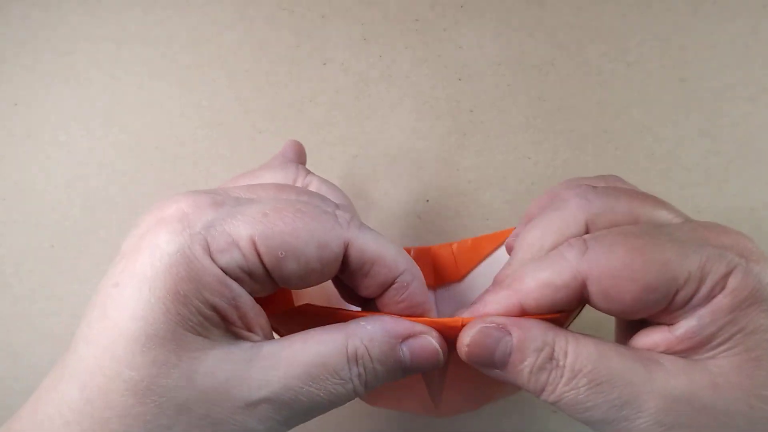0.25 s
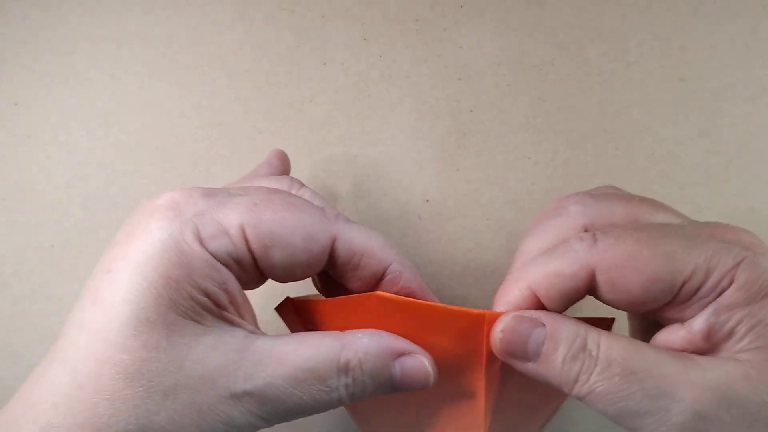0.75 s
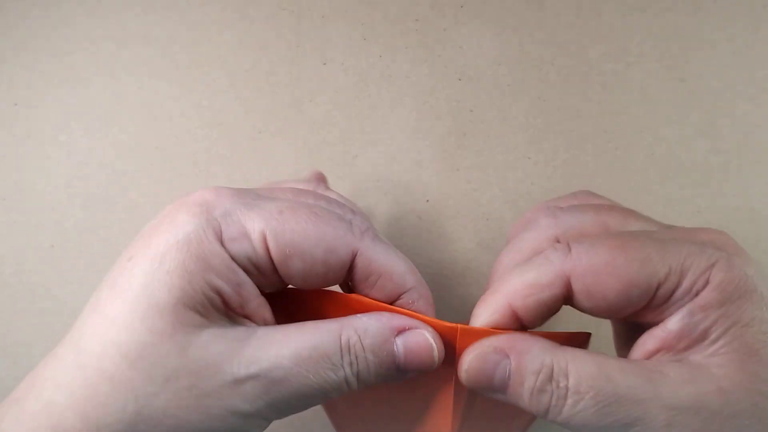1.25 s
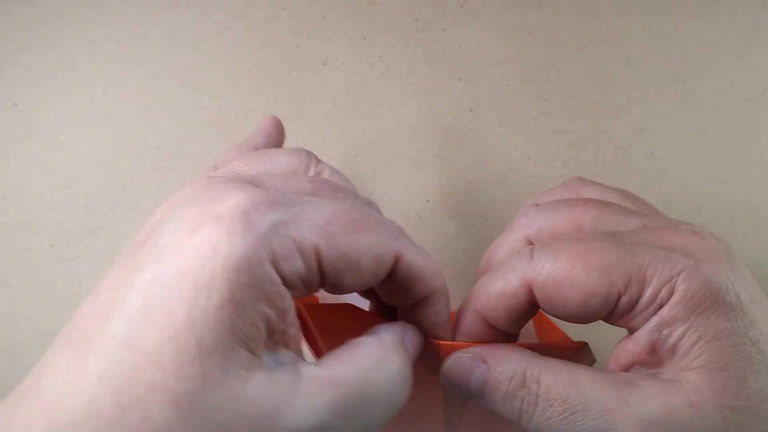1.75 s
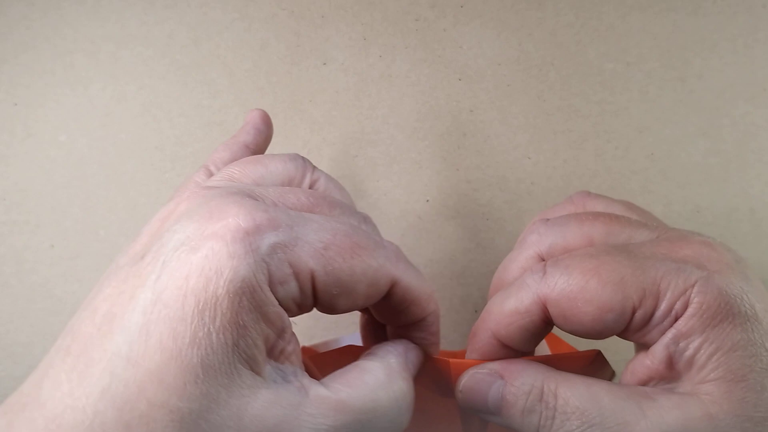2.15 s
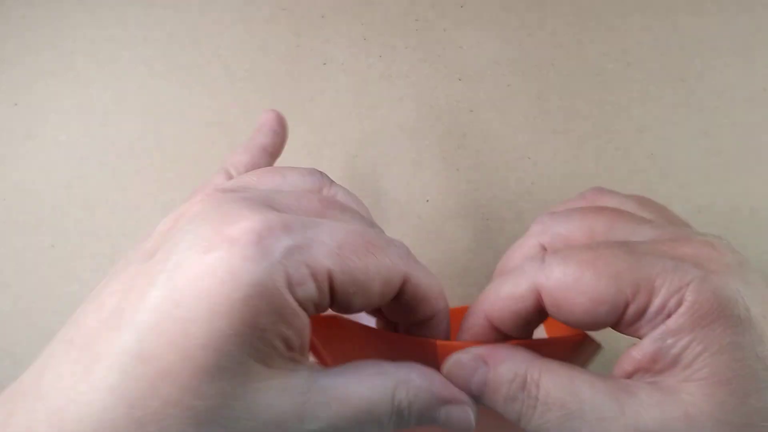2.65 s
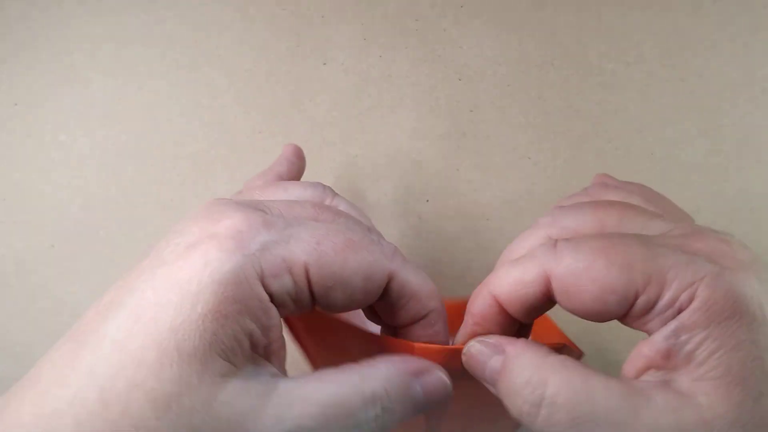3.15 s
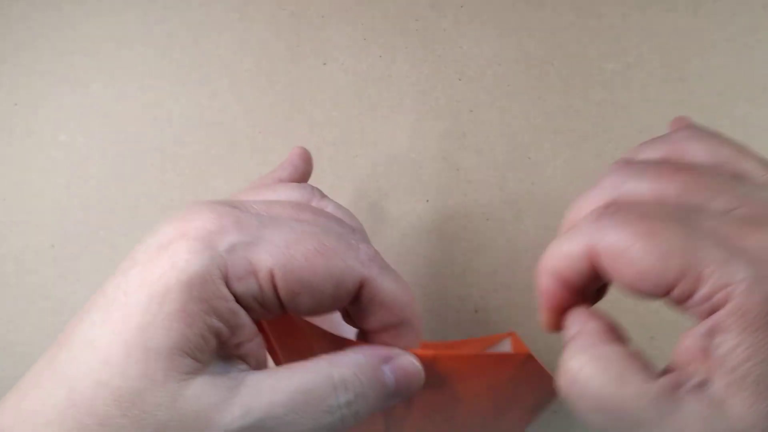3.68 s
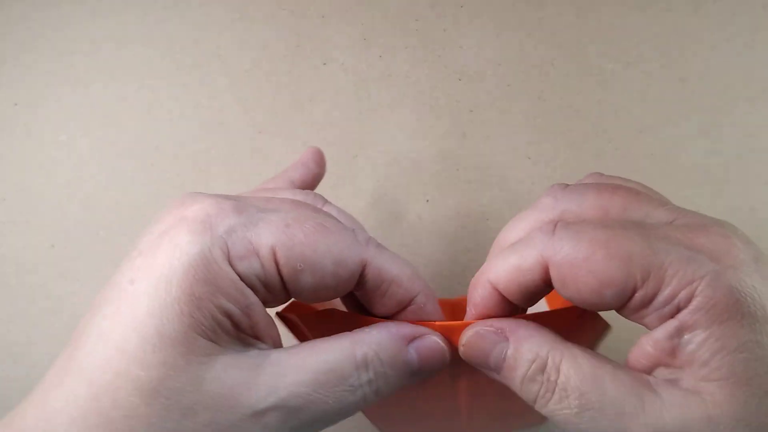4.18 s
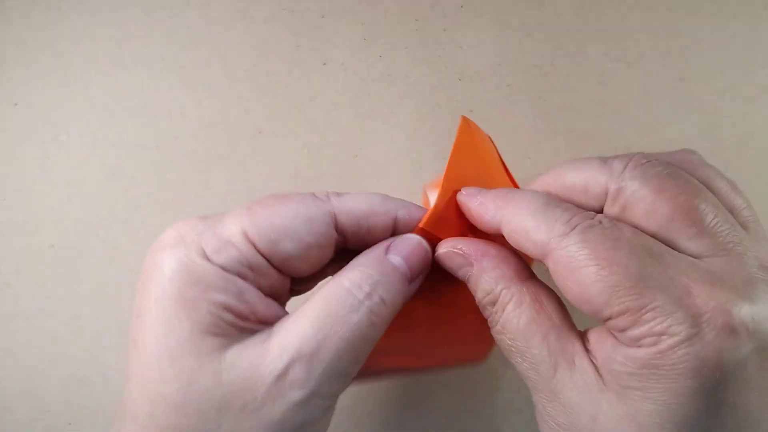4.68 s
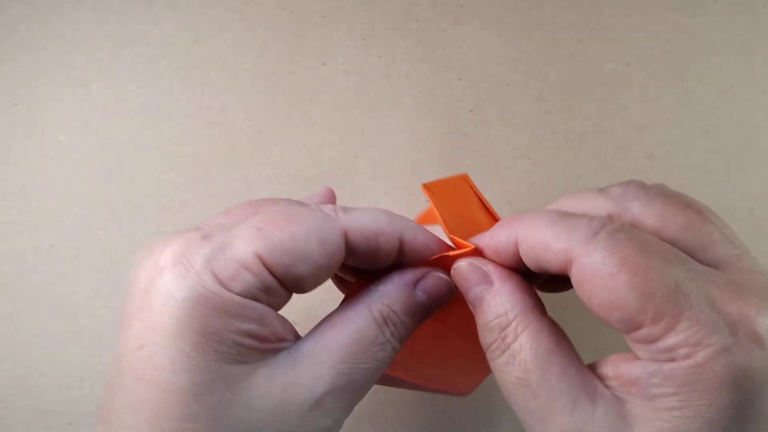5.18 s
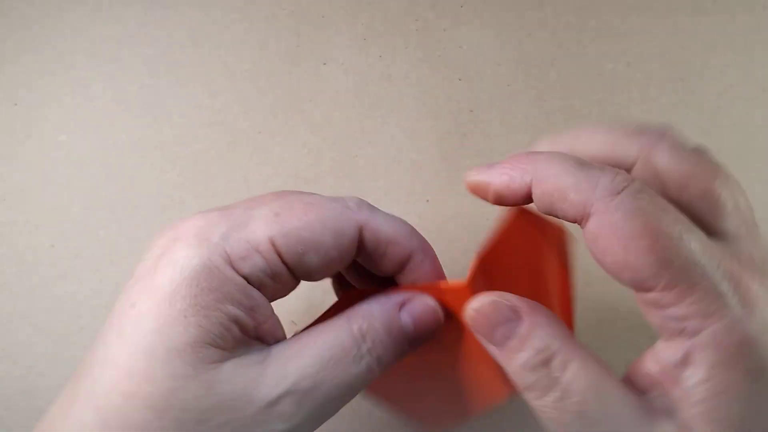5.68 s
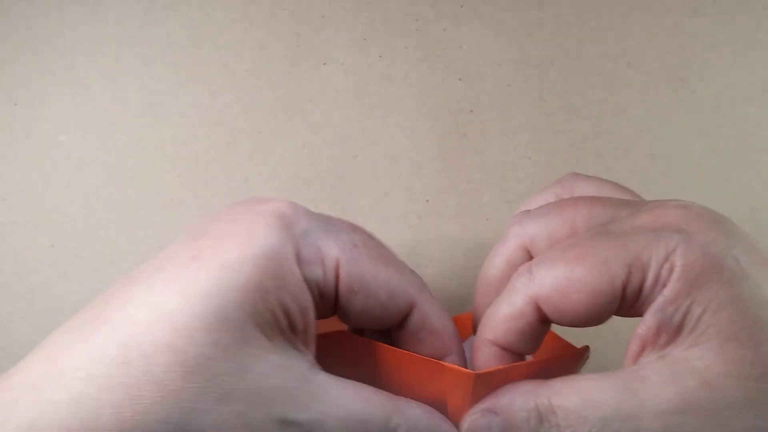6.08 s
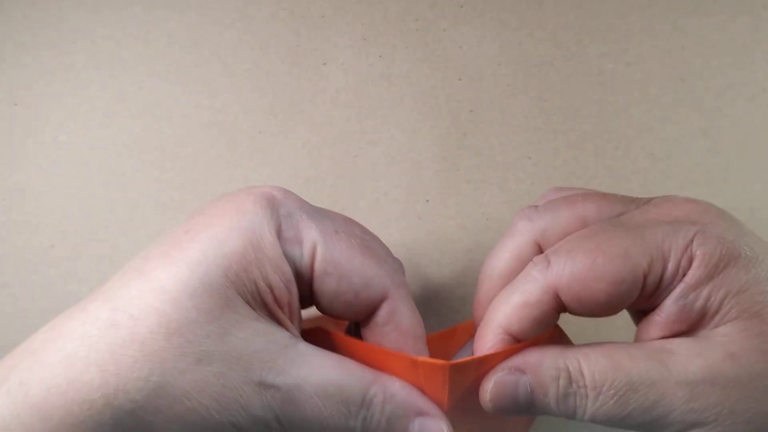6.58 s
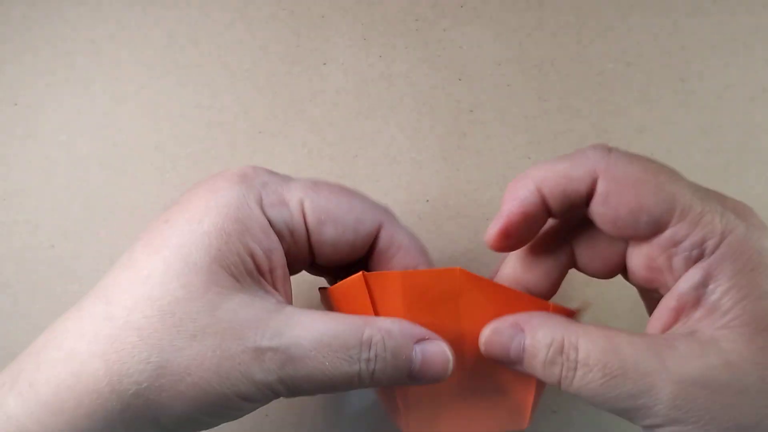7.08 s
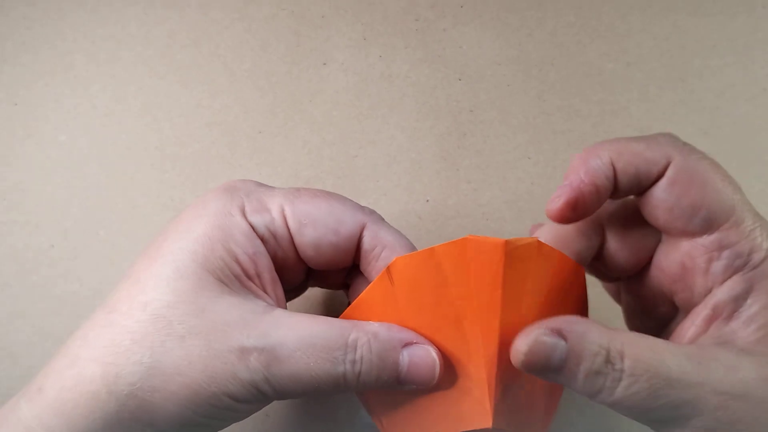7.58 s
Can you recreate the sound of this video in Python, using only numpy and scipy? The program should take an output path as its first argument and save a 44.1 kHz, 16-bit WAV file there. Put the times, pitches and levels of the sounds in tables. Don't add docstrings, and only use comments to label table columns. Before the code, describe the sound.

Hands fold a small stiff sheet of thin paper close to a stereo pair of microphones. Fingertips brush softly, creases crackle brightly, and panels buckle with dry, short pops. Scattered small clicks come first, then a dense rustling crackle near two and a half seconds, sparser handling, and the loudest snaps just after six and seven seconds. Faint desk thuds, slight room reflection, low fan hum and hiss.

```python
import sys
import numpy as np
from scipy import signal
from scipy.fft import rfft, irfft, next_fast_len
from scipy.io import wavfile
from scipy.ndimage import uniform_filter1d, map_coordinates

SR = 44100
rng = np.random.default_rng(int(sys.argv[2]) if len(sys.argv) > 2 else 0)


def attenuation_scalar(level_db):
    decades = np.asarray(level_db, float) / 20
    return 10 ** decades


def file_out(sig):
    cols = np.atleast_2d(sig).T
    lim = np.clip(cols, -1, 1)
    pcm = np.round(lim * 32767).astype(np.int16)
    wavfile.write(sys.argv[1], SR, pcm)


N = 345303


def unit(x):
    return x / np.sqrt(np.mean(x ** 2) + 1e-20)


def along(points, hz):
    point_hz, value = np.transpose(points)
    return np.interp(np.log(hz + 1), np.log(point_hz + 1), value)


def curves(rows):
    time_s, *columns = np.transpose(rows)
    return [np.interp(np.arange(N) / SR, time_s, column) for column in columns]


def wobble(rate_hz):
    knots = rng.standard_normal(int(N * rate_hz / SR) + 4)
    return map_coordinates(knots, [np.arange(N) * rate_hz / SR])


def filtered(x, response):
    size = next_fast_len(x.shape[-1] + 4096)
    spectrum = rfft(x, size) * response(np.fft.rfftfreq(size, 1 / SR))
    return irfft(spectrum, size)[..., :x.shape[-1]]


def modes(table):
    def response(f):
        total = 0
        for k, (centre_hz, width_hz, level_db) in enumerate(table):
            damping = 1j * f * width_hz
            total = total + (-1) ** k * attenuation_scalar(level_db) * damping / (centre_hz ** 2 - f * f + damping)
        return total
    return response


def pair(size, alike):
    common, different = rng.standard_normal((2, size))
    turn = np.arccos(np.clip(alike, 0, 1)) / 2
    return np.cos(turn) * common + np.sin(turn) * different * np.array([[1], [-1]])


def patchy(x, patch_db):
    z = signal.stft(x, nperseg=256)[2]
    field = uniform_filter1d(rng.standard_normal(z.shape[1:]), size=14, axis=0)
    field = uniform_filter1d(field, size=5, axis=1)
    return signal.istft(z * attenuation_scalar(patch_db * unit(field)), nperseg=256)[1][:, :N]


def burst(t60_s, rise_s, alike, kick):
    t = np.arange(SR // 12) / SR
    envelope = (1 - np.exp(-t / rise_s)) * attenuation_scalar(-60 * t / np.clip(t60_s, .004, .15))
    swarm = pair(len(t), alike) * envelope
    creak_samples = 30
    return swarm + kick * (np.arange(len(t)) == creak_samples)


def add(track, start_s, x, peak_db):
    at = round(start_s * SR)
    track[:, at:at + x.shape[1]] += attenuation_scalar(peak_db) * x / np.abs(x.mean(0)).max()


# hz, density_db
HISS_SPECTRUM = [(15, -48), (25, -21.5), (53, -10), (129, -5), (233, -10), (433, -12.5), (684, -14),
                 (1620, -18.5), (1800, -20), (2420, -19), (3250, -22), (4200, -21), (15500, -25)]
# hz, likeness
HISS_LIKENESS = [(60, 0.83), (240, 0.76), (950, 0.063), (3770, -0.086), (15000, 0.025)]
# time_s, fan_db, hiss_db
FLOOR_LEVELS = [(0, -76.5, -81), (.38, -73, -80), (.7, -79, -83.5), (1.1, -77.5, -73.5), (1.5, -69, -73.5),
                (2, -73, -74), (2.42, -58, -72), (2.7, -67, -73.5), (3.15, -66.5, -72), (3.6, -70.5, -72),
                (4.2, -70.5, -75), (4.56, -76.5, -73), (4.71, -60.5, -71), (5.4, -71, -71),
                (6.6, -66.5, -73.5), (7.2, -65, -73), (7.83, -68, -75)]


def floor():
    fan_db, hiss_db = curves(FLOOR_LEVELS)

    def mid_side(hz):
        turn = np.arccos(np.clip(along(HISS_LIKENESS, hz), -1, 1)) / 2
        return attenuation_scalar(along(HISS_SPECTRUM, hz)) * np.array([np.cos(turn), np.sin(turn)])

    mid, side = filtered(rng.standard_normal((2, N)), mid_side)
    hiss = unit(np.array([mid + side, mid - side]))
    fan = unit(filtered(rng.standard_normal(N), modes([(126, 14, 1), (104, 20, -8), (62, 22, -20)])))
    return attenuation_scalar(hiss_db + 9.5) * hiss + attenuation_scalar(fan_db + 0.81 * wobble(8.9)) * fan


# start_s, length_s, start_hiss_db, body_over_hiss_db
SLIPS_TO_REST = [(0, 0.048, -66.5, -8.5), (0.148, 0.052, -54, 2.5), (0.215, 0.091, -46, -18),
                 (0.28, 0.052, -57, 0.5), (0.681, 0.045, -59, -10), (1.054, 0.038, -50, 2.5),
                 (1.174, 0.021, -46.5, -1.5), (1.223, 0.057, -35.5, -12), (1.516, 0.079, -50, 9.5),
                 (1.63, 0.042, -42, -5), (1.936, 0.083, -65.5, 8), (2.001, 0.048, -54.5, 1.5),
                 (2.539, 0.058, -39, 2), (2.863, 0.11, -43.5, -6), (3.129, 0.073, -41.5, -6),
                 (3.654, 0.11, -40, 1), (3.797, 0.06, -49, 6), (4.079, 0.013, -40, -0.5),
                 (4.188, 0.074, -47.5, -7.5), (4.552, 0.051, -31, -12), (4.788, 0.15, -46.5, -11.5),
                 (5.341, 0.068, -48, -8), (5.637, 0.081, -55, -1.5), (5.79, 0.068, -33.5, -4.5),
                 (6.019, 0.22, -51.5, -4.5), (6.101, 0.076, -52, 7), (6.145, 0.16, -45.5, 1),
                 (6.399, 0.065, -58, 13.5), (6.952, 0.052, -42.5, -4.5), (7.273, 0.073, -38.5, -15.5),
                 (7.452, 0.039, -41.5, -1.5)]
# start_s, length_s, end_hiss_db
PRESSES_FROM_REST = [(0.505, 0.046, -47.5), (0.752, 0.07, -65), (1.301, 0.027, -39.5),
                     (1.386, 0.037, -52.5), (1.486, 0.029, -46), (1.569, 0.054, -38), (1.648, 0.12, -52.5),
                     (2.18, 0.12, -43), (2.488, 0.013, -35), (2.806, 0.07, -45), (2.845, 0.0092, -34),
                     (3.184, 0.051, -50), (3.313, 0.051, -55.5), (3.75, 0.049, -37.5),
                     (4.288, 0.047, -45.5), (4.374, 0.078, -52.5), (4.512, 0.12, -58.5), (4.93, 0.036, -48),
                     (5.453, 0.017, -57), (5.87, 0.053, -67), (5.898, 0.034, -57.5), (5.971, 0.062, -56),
                     (6.53, 0.036, -46.5), (6.854, 0.037, -55.5), (7.177, 0.068, -46), (7.389, 0.064, -71),
                     (7.538, 0.069, -48.5)]
# start_s, length_s, hiss_db, body_over_hiss_db
EVEN_RUBS = [(0.437, 0.057, -60, -7), (0.562, 0.044, -58.5, -5), (0.807, 0.15, -64, -22),
             (1.105, 0.054, -69.5, 2), (1.76, 0.11, -55.5, -14), (2.31, 0.07, -37.5, -4),
             (2.406, 0.1, -38, -4), (2.503, 0.015, -31.5, -34.5), (2.517, 0.023, -29, -33),
             (3.238, 0.047, -48.5, -3.5), (3.419, 0.019, -58.5, -0.5), (3.458, 0.18, -58.5, -3),
             (4.129, 0.061, -51.5, -8.5), (4.256, 0.03, -47, -7), (4.445, 0.038, -55.5, -6),
             (4.75, 0.036, -43, -8.5), (5.07, 0.089, -53, -12.5), (5.171, 0.074, -44, -9.5),
             (5.238, 0.17, -67, -11), (5.736, 0.034, -46.5, -6.5), (6.271, 0.024, -38, -6.5),
             (6.297, 0.033, -42, -6), (6.347, 0.039, -63, 4), (6.574, 0.046, -60.5, -2),
             (6.736, 0.062, -53.5, -6.5), (6.876, 0.037, -49.5, -9.5), (7.228, 0.043, -49.5, 2),
             (7.638, 0.13, -63.5, -21), (7.755, 0.098, -66.5, -5)]
SETTLED_DB, POISED_DB, PRESS_BODY_DB = -67, -62, -5


def strokes():
    slips = [(s, length, db, SETTLED_DB, body_db) for s, length, db, body_db in SLIPS_TO_REST]
    presses = [(s, length, POISED_DB, db, PRESS_BODY_DB) for s, length, db in PRESSES_FROM_REST]
    rubs = [(s, length, db, db, body_db) for s, length, db, body_db in EVEN_RUBS]
    return slips + presses + rubs


# hz, density_db
FIBRE_SPECTRUM = [(1760, -16.5), (3000, -11.5), (3710, -7.5), (4120, -6.5), (5160, -10), (7850, -5),
                  (8530, -8), (10300, -8.5), (15500, -14.5)]
# centre_hz, width_hz, level_db
SHEET_MODES = [(1200, 400, -2), (1638, 125, -7), (2120, 120, 2), (2700, 327, -4)]
# centre_hz, width_hz, level_db
DESK_MODES = [(437.6, 24, 0), (279, 188, -3), (432, 520, -3), (210, 250, -31.5)]


def slide():
    speed, press = np.zeros((2, N + SR))
    for start_s, length_s, first_db, last_db, body_db in strokes():
        stroke = attenuation_scalar(np.linspace(first_db, last_db, round(max(length_s, .005) * SR)))
        at = round(start_s * SR)
        speed[at:at + len(stroke)] += stroke
        press[at:at + len(stroke)] += stroke * attenuation_scalar(body_db)
    speed, press = uniform_filter1d(np.array([speed, press])[:, :N], size=200)

    def catch(fast_db):
        return unit(attenuation_scalar(0.34 * wobble(46) + fast_db * wobble(200) + 1.27 * wobble(900)))

    hiss_noise = patchy(pair(N, 0.1), patch_db=2.0)
    hiss = unit(filtered(hiss_noise, lambda hz: attenuation_scalar(along(FIBRE_SPECTRUM, hz))))
    body_noise = patchy(pair(N, 0.64), patch_db=4.0)
    body = unit(filtered(press * catch(1.9) * body_noise, modes(SHEET_MODES)))
    desk = unit(filtered(press * catch(2.5) * pair(N, .9), modes(DESK_MODES)))
    weight = np.sqrt(np.mean(press ** 2))
    rub = attenuation_scalar(-1.5) * speed * catch(0.96) * hiss * attenuation_scalar([[-.8], [.8]])
    return rub + weight * attenuation_scalar(-3.5) * (body + desk)


# start_s, peak_db, left_right_db
FOLD_CRACKS = [(0.149, -38, -11), (0.2064, -15, -1.5), (0.283, -24, 0), (0.441, -38, 1), (0.593, -32.5, 0),
               (0.738, -40, 4), (1.0594, -23, 1), (1.152, -43, -1), (1.32, -43, -5), (1.515, -23, -10),
               (1.5726, -21.5, 7), (1.624, -22.5, 1), (2.2415, -31, 0), (2.354, -23, 7), (2.4054, -24, 1),
               (2.853, -31, -4), (2.868, -11, 0.5), (3.202, -29.5, 3), (3.252, -23, 7), (3.802, -21.5, 0),
               (4.525, -36, -1), (4.555, -25, 3), (5.4435, -26.5, 6), (5.7478, -34, -9), (6.062, -31, -6),
               (6.1391, -6.5, -1.5), (6.371, -43.5, -4), (6.4034, -21.5, 2), (7.214, -10, -4),
               (7.4408, -23, 1)]
# start_s, peak_db, left_right_db
PINCH_CRACKS = [(0.499, -52, -2), (1.179, -37, -11), (1.2251, -54, -3), (1.538, -31, -10), (2.196, -39, -8),
                (2.3042, -23, -1), (2.317, -26, -6), (2.338, -30, -3), (2.359, -30, -2), (2.392, -17, 0),
                (2.447, -31, -3), (2.481, -29, 2), (2.508, -21, -3), (2.511, -25, -4), (2.514, -27, -1),
                (2.525, -26, 2), (3.1328, -18, 5), (3.1472, -27, 7), (3.655, -20, 0), (3.6703, -21.5, -11),
                (3.76, -19, -1.5), (4.2547, -35.5, -16), (4.321, -34, -1), (4.424, -39, -5),
                (5.1758, -11.5, -2.5), (5.237, -37, 1), (5.3448, -58, -5), (5.793, -26, -5),
                (6.111, -11.5, -3), (6.274, -42.5, -3), (6.558, -54, -6), (7.2133, -10.5, -3),
                (7.5716, -37.5, -1)]
FOLD_HZ, PINCH_HZ = 3560, 7200
CRACK_TOP_HZ = 14400


def cracks():
    track = np.zeros((2, N + SR))
    events = [(*row, FOLD_HZ) for row in FOLD_CRACKS] + [(*row, PINCH_HZ) for row in PINCH_CRACKS]
    for start_s, peak_db, pan_db, centre_hz in events:
        def colour(hz):
            bump_db = 11.2 * np.exp(-np.log2((hz + 1) / centre_hz) ** 2 / 1.4)
            return attenuation_scalar(along(FIBRE_SPECTRUM, hz) + bump_db) / (1 + (hz / CRACK_TOP_HZ) ** 4)

        t60_s = 0.022 * attenuation_scalar(0.059 * (peak_db + 42))
        crack = filtered(burst(t60_s, rise_s=0.00013, alike=0.25, kick=3.87), colour)
        side_db = np.clip(pan_db, -7, 7) / 2
        add(track, start_s, crack * attenuation_scalar([[side_db], [-side_db]]), peak_db + 0.5)
    return track[:, :N]


# start_s, peak_db, pitch_hz,
# ring_over_sheet_db
LARGE_PANELS = [(0.151, -35, 1080, 9), (0.867, -37, 1140, -5), (0.968, -43, 770, 21),
                (1.033, -38, 1010, 23), (1.058, -32, 960, 16), (1.224, -30.5, 800, 9),
                (1.514, -15, 1080, 8.5), (1.539, -37, 840, 12), (1.579, -25, 760, 10),
                (1.605, -28, 740, 16), (1.635, -26, 670, 5), (1.941, -23, 990, -13), (2.243, -33, 1250, -2),
                (2.354, -21, 1650, 8), (2.364, -46, 1300, 4), (2.43, -31, 1220, 10),
                (2.868, -21.5, 2520, 32), (2.87, -25, 3000, 24), (3.132, -33.5, 1250, -1),
                (3.201, -19, 1250, 12), (3.252, -27, 1200, 13), (3.67, -27.5, 1060, 4),
                (3.761, -27, 1050, -11), (3.803, -24.5, 1150, 8), (4.556, -25, 2200, 20),
                (4.762, -38, 1100, 20), (4.901, -30, 1100, -10), (5.174, -28, 1080, 1),
                (5.215, -22, 1200, 8), (5.442, -21, 940, -6), (5.706, -37, 1090, -7),
                (5.742, -28.5, 1390, 9), (6.037, -37, 1350, 24), (6.062, -30, 790, 9),
                (6.111, -16, 1200, 13), (6.138, -23, 1150, 6.5), (6.29, -26, 1130, 19),
                (6.301, -23.5, 1260, 2), (6.403, -16, 1370, 16), (6.404, -23, 4030, 17),
                (6.784, -26.5, 1120, 9), (6.955, -44, 1140, 10.5), (6.965, -36, 1201, 10),
                (7.213, -12, 1230, -1), (7.214, -14, 1600, 3), (7.233, -22.5, 900, 11),
                (7.44, -19, 1240, 12)]
# start_s, peak_db, pitch_hz
SMALL_PANELS = [(0.15, -31.5, 2130), (0.282, -25, 990), (0.205, -54, 2170), (0.283, -27.5, 2280),
                (0.439, -38, 2100), (0.737, -31.5, 2120), (1.176, -51, 2150), (1.226, -48, 2180),
                (1.316, -30, 2120), (1.319, -25.5, 2120), (1.515, -26.5, 2520), (1.572, -16.5, 2120),
                (1.622, -25, 1800), (1.944, -26.5, 1800), (2.303, -21.5, 2540), (2.316, -28.5, 2120),
                (2.332, -32, 2230), (2.351, -21, 1700), (2.359, -31, 2300), (2.373, -30, 2220),
                (2.391, -23.5, 2000), (2.405, -27.5, 1980), (2.525, -18.5, 2620), (2.553, -44, 2450),
                (2.852, -27, 2220), (3.131, -31.5, 2000), (3.148, -38, 2120), (3.252, -27, 2230),
                (3.654, -28, 2120), (3.671, -33, 2100), (3.806, -27.5, 2180), (4.082, -42.5, 2060),
                (4.252, -45, 2100), (4.322, -32, 2040), (4.902, -36, 2400), (5.743, -26, 2040),
                (5.785, -34, 2150), (5.879, -45, 2120), (6.111, -13.5, 2100), (6.138, -12.5, 2280),
                (6.141, -21, 4050), (6.149, -23, 2450), (6.272, -34.5, 2700), (6.291, -28.5, 2130),
                (6.404, -24.5, 2180), (7.208, -30, 1300), (7.214, -15.5, 2490), (7.216, -19, 2060),
                (7.443, -22, 2080), (7.575, -28.5, 2060)]
# start_s, peak_db
SHEET_TICKS = [(0.348, -45), (0.571, -47), (0.696, -55), (1.152, -56), (2.176, -51), (2.195, -49),
               (2.777, -51), (3.305, -55), (3.345, -53), (3.425, -56), (3.472, -56), (4.525, -46),
               (4.856, -59), (4.989, -50), (5.036, -52), (6.021, -47), (6.632, -56), (6.745, -50),
               (6.912, -49), (7.097, -51)]
# centre_hz, width_hz, level_db
LARGE_SECOND_MODE = (1430, 900, -14.5)
# centre_hz, width_hz, level_db
SMALL_NEIGHBOUR_MODE = (1118, 254, -0.094)
LARGE_T60_S, SMALL_T60_S, TICK_T60_S = 0.031, 0.019, 0.059
TICK_HZ, SMALL_RING_DB, TICK_RING_DB = 1200, 1, 7
PANEL_DAMPING = .19


def buckles():
    large = [(*row, LARGE_T60_S, LARGE_SECOND_MODE) for row in LARGE_PANELS]
    small = [(*row, SMALL_RING_DB, SMALL_T60_S, SMALL_NEIGHBOUR_MODE) for row in SMALL_PANELS]
    ticks = [(*row, TICK_HZ, TICK_RING_DB, TICK_T60_S, LARGE_SECOND_MODE) for row in SHEET_TICKS]
    return large + small + ticks


def pops():
    track = np.zeros((2, N + SR))
    for start_s, peak_db, pitch_hz, ring_db, t60_s, partner in buckles():
        sheet = modes(sorted([partner, *SHEET_MODES]))
        own = modes([(pitch_hz, PANEL_DAMPING * pitch_hz, ring_db)])

        def panel(f):
            snap = 0.073 * 1j * f / (600 + 1j * f)
            slowness = 1 + 1j * f / (1.38 * pitch_hz)
            return (sheet(f) + snap) * (1 + own(f)) / slowness

        pop = filtered(burst(t60_s, rise_s=0.0001, alike=0.9, kick=11.4), panel)
        add(track, start_s, pop * attenuation_scalar([[-.4], [.4]]), peak_db - 0.5)
    return track[:, :N]


# start_s, length_s, level_db, pitch_hz
NAIL_DRAGS = [(0.283, 0.04, -59, 776), (0.358, 0.087, -75.5, 4230), (0.963, 0.044, -65, 450),
              (1.231, 0.074, -63, 435), (2.324, 0.059, -39, 2304), (2.33, 0.043, -44, 460),
              (2.334, 0.048, -42, 1280), (2.425, .085, -43, 1280), (2.428, 0.065, -47, 4190),
              (2.466, 0.056, -44, 2600), (2.478, 0.019, -50, 1320), (2.502, 0.012, -41, 2600),
              (2.507, 0.0092, -29, 7800), (2.508, 0.015, -31.5, 9800), (2.538, 0.051, -47, 442),
              (3.144, 0.031, -54, 497), (3.21, 0.088, -52, 480), (3.492, 0.15, -68, 10500),
              (3.55, 0.17, -66.5, 1110), (3.689, 0.032, -53, 477), (3.81, 0.032, -41.5, 424),
              (4.079, 0.031, -58.5, 462), (4.565, 0.032, -64, 2120), (4.762, 0.041, -57, 2330),
              (4.795, 0.071, -59, 470), (5.338, 0.058, -63, 2130), (5.802, 0.017, -44.5, 230),
              (6.139, 0.054, -59, 440), (6.296, 0.036, -48.5, 430), (6.575, 0.042, -74, 2120),
              (6.702, 0.13, -76, 2120), (6.855, 0.071, -63, 2120), (6.871, 0.032, -52, 14300),
              (6.98, .04, -69, 2120), (7.047, 0.044, -74, 2120), (7.221, 0.082, -52, 505),
              (7.576, 0.03, -51, 430), (7.694, 0.13, -70, 2130)]


def drags():
    track = np.zeros((2, N + SR))
    stutter = attenuation_scalar(1.4 * wobble(250))
    for start_s, length_s, level_db, pitch_hz in NAIL_DRAGS:
        size, at = round(max(length_s, .005) * SR), round(start_s * SR)
        stroke = stutter[at:at + size] * attenuation_scalar(np.linspace(0, -5, size))
        stroke = np.pad(stroke, (0, 2048))
        sing = filtered(stroke * pair(len(stroke), 0.98), modes([(pitch_hz, 0.11 * pitch_hz, 0)]))
        track[:, at:at + len(stroke)] += attenuation_scalar(level_db) * unit(sing) * np.sqrt(size / len(stroke))
    return track[:, :N]


# start_s, peak_db, pitch_hz
DESK_PUSHES = [(0.472, -55, 520), (0.598, -52.5, 510), (0.97, -62, 442), (1.03, -46.5, 650),
               (1.058, -43.5, 557), (1.149, -51.5, 505), (1.176, -55, 480), (1.224, -39.5, 530),
               (1.241, -36, 333), (1.314, -44, 437), (1.515, -40, 446), (1.632, -37, 454),
               (1.943, -44, 452), (2.39, -38.5, 390), (2.524, -35.5, 305), (3.137, -43.5, 504),
               (3.147, -57, 503), (3.199, -36, 425), (3.247, -39.5, 440), (3.657, -41.5, 676),
               (3.759, -34, 452), (3.799, -34, 360), (4.759, -46.5, 500), (4.797, -43.5, 426),
               (4.852, -57, 479), (4.902, -40, 442), (4.949, -62, 355), (4.988, -45.5, 386),
               (5.023, -53, 324), (5.173, -44, 307), (5.44, -38, 440), (5.799, -44, 233), (6.137, -31, 456),
               (6.288, -34, 434), (6.401, -32, 437), (6.783, -37.5, 290), (6.787, -39.5, 456),
               (6.954, -49, 280), (7.21, -31, 405), (7.232, -37.5, 505), (7.442, -41, 470),
               (7.573, -36.5, 466)]
DESK_DELAY_S = .002


def thuds():
    track = np.zeros((2, N + SR))
    for start_s, peak_db, pitch_hz in DESK_PUSHES:
        desk = modes([(pitch_hz, 0.23 * pitch_hz, 2), *DESK_MODES])
        thud = filtered(burst(0.044, rise_s=0.00083, alike=0.74, kick=0), desk)
        add(track, start_s + DESK_DELAY_S, thud, peak_db + 4.5)
    return track[:, :N]


# start_s, peak_db, start_hz, end_hz, t60_s
CORNER_FLAP = (6.408, -38.5, 1570, 1500, .2)


def flap():
    track, t = np.zeros((2, N + SR)), np.arange(SR // 5) / SR
    start_s, peak_db, start_hz, end_hz, t60_s = CORNER_FLAP
    pitch_hz = end_hz + (start_hz - end_hz) * np.exp(-t / 0.048)
    tone = np.sin(2 * np.pi * np.cumsum(pitch_hz) / SR) * attenuation_scalar(-60 * t / t60_s)
    add(track, start_s, tone * np.ones((2, 1)), peak_db)
    return track[:, :N]


# hz, t60_s
ROOM_DECAY = [(300, 0.32), (1500, 0.29), (8000, 0.2)]


def room(x):
    out = np.zeros((2, N + SR))
    stir = SR // 8
    for at in range(0, N, stir):
        hz, t, z = signal.stft(rng.standard_normal((2, SR // 3)), SR, nperseg=256)
        decay = attenuation_scalar(-60 * t / along(ROOM_DECAY, hz)[:, None])
        tail = signal.istft(z * decay, SR, nperseg=256)[1]
        tail = tail / np.linalg.norm(tail[0])
        answer = signal.fftconvolve(x.mean(0)[None, at:at + stir], tail, axes=1)
        out[:, at + 150:][:, :answer.shape[1]] += answer
    return out[:, :N]


# hz, lean_db
RIGHT_LEAN = [(250, 0.104), (500, 0.81), (1200, 0.01), (4000, 0.13), (9000, 0.87)]
# hz, level_db
ROOM_LEVEL = [(300, -9), (440, -11), (1100, -18), (1750, -13), (2120, -17.5), (2600, -15.5), (4050, -11),
              (8000, -13.5)]
# hz, level_db
STEREO_WIDTH = [(200, 0.5), (330, -11.5), (550, 3), (1000, 0)]
LEFT_LAG_S = 3.5 / SR
LOW_CUT_HZ = 130


def scene():
    paper = slide() + cracks() + pops() + drags() + thuds() + flap()
    paper = filtered(paper, lambda hz: (1j * hz / (LOW_CUT_HZ + 1j * hz)) ** 2)
    side = np.array([[-1], [1]])

    def to_microphones(hz):
        return np.exp(side * 1j * np.pi * hz * LEFT_LAG_S) * attenuation_scalar(side * along(RIGHT_LEAN, hz))

    direct = filtered(paper, to_microphones)
    near = direct + filtered(room(paper), lambda hz: attenuation_scalar(along(ROOM_LEVEL, hz)))
    mid = near.mean(0)
    return mid + filtered(near - mid, lambda hz: attenuation_scalar(along(STEREO_WIDTH, hz))) + floor()


def low_pass(x):
    return signal.sosfilt(signal.butter(12, 16960, fs=SR, output="sos"), x)


def record(dry):
    rounded = dry / (1 + np.abs(dry / .85) ** 3) ** (1 / 3)
    top_roll_off = [(15700, 0), (15950, -22), (16800, -30), (17000, -120)]  # hz, level_db
    mix = filtered(rounded, lambda hz: attenuation_scalar(along(top_roll_off, hz)))
    return low_pass(mix)


dry = scene()
out = record(dry)
file_out(out)
```